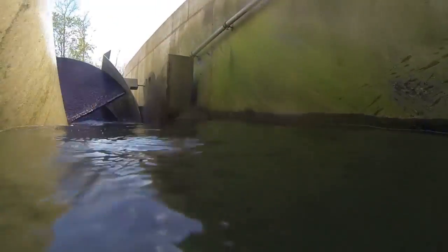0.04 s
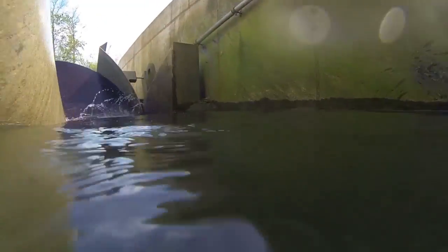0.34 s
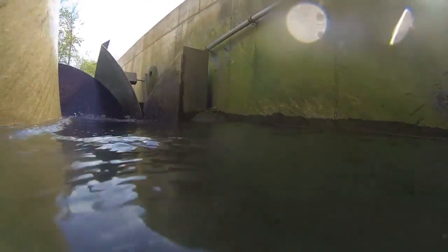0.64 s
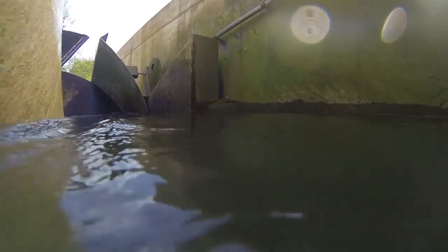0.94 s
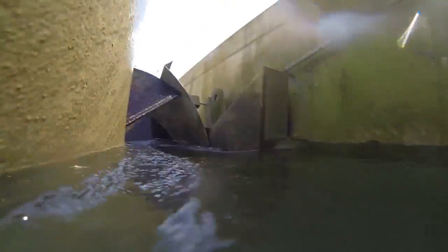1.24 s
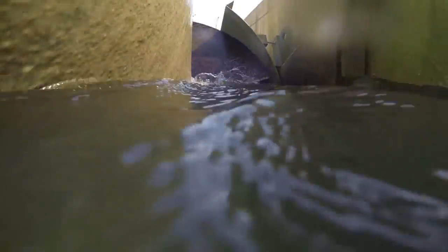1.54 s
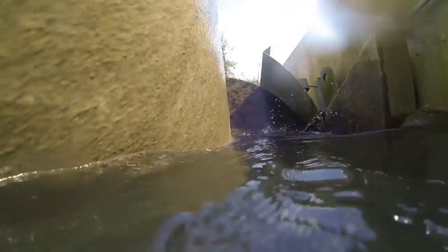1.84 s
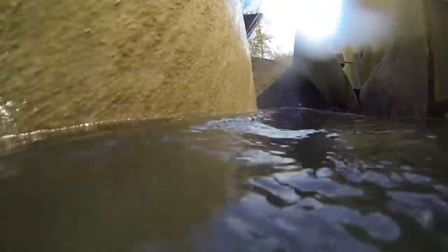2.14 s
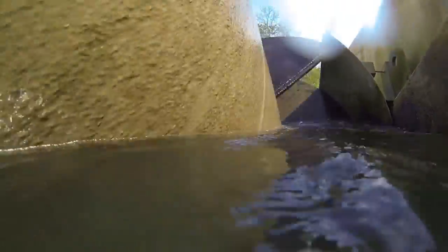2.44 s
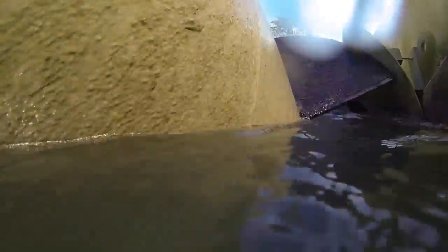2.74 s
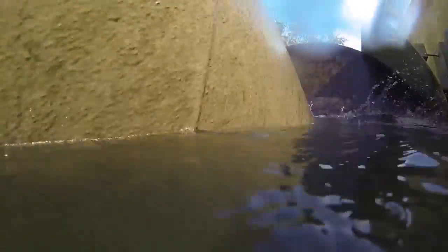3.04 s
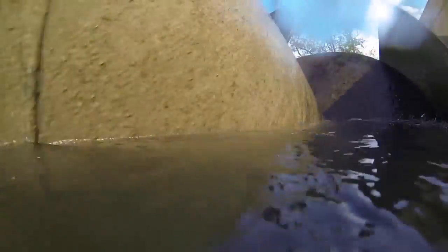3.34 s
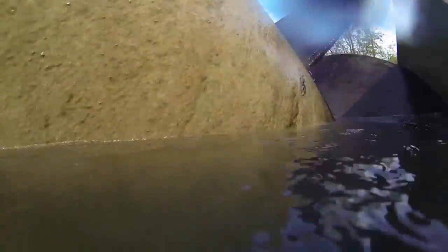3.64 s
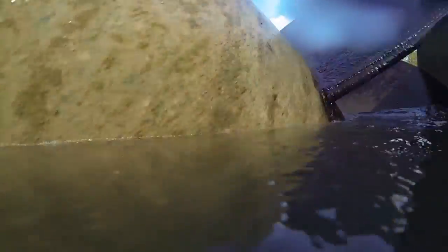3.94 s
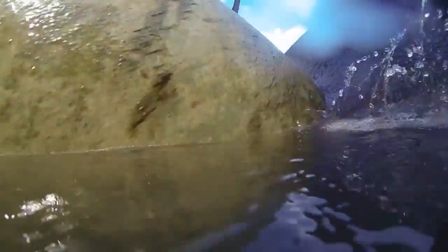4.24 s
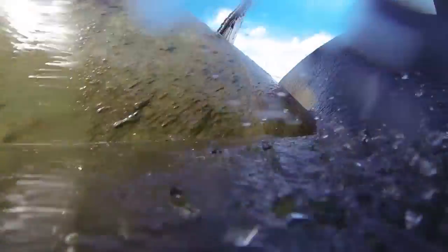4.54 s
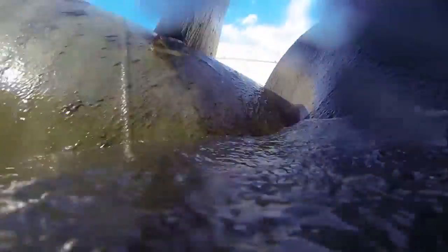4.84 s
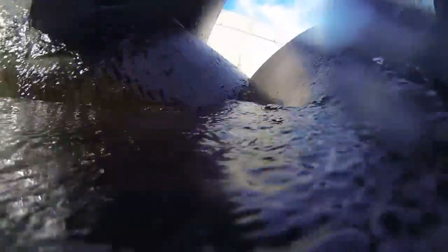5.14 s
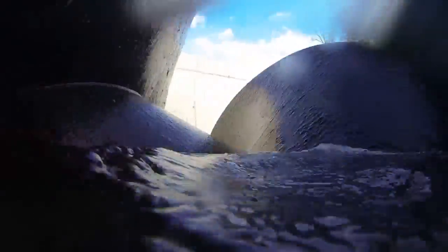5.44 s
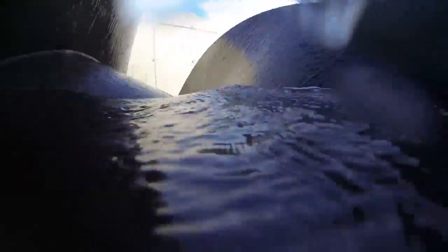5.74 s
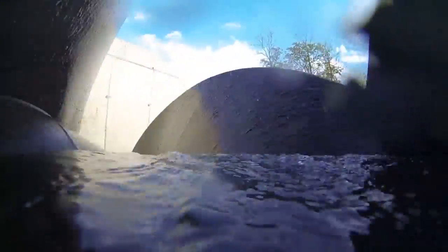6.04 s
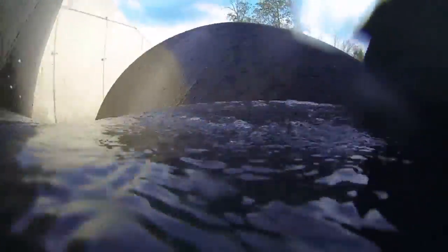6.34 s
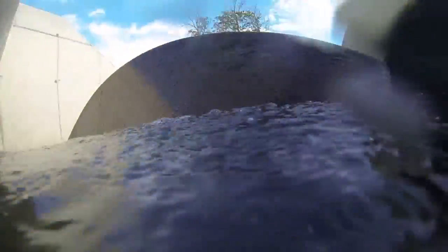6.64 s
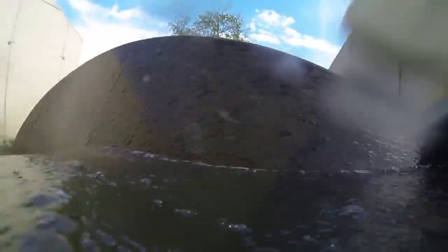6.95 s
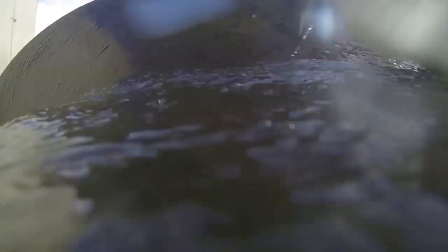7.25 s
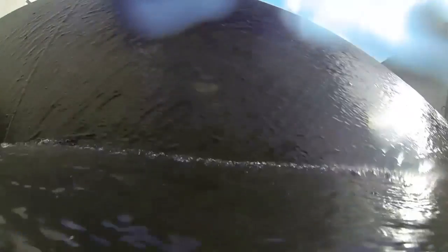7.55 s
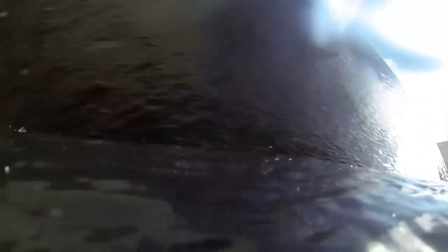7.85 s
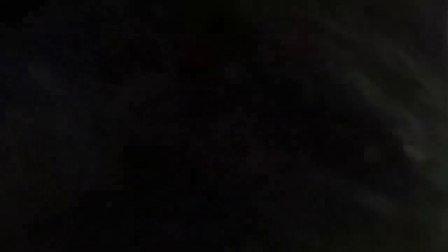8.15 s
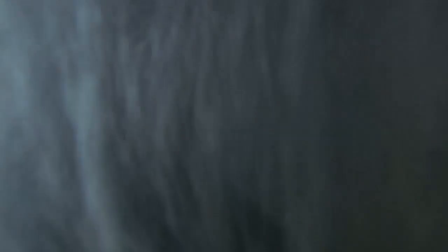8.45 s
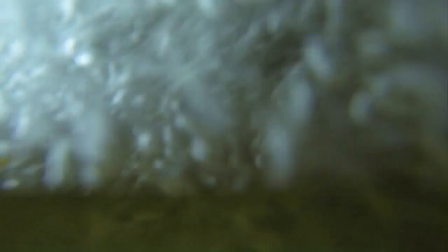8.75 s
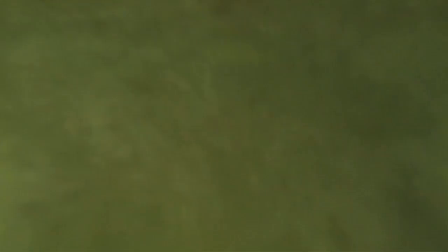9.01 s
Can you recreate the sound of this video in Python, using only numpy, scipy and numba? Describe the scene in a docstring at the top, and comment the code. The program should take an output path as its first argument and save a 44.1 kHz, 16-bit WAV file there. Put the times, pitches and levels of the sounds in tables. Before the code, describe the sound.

Water churns through a turning screw and grows louder, wavelets slap close by, then a knock and loud bubbling white water.

```python
"""A concrete water channel, heard from a microphone in a waterproof camera housing adrift on the surface.
At first a turning water screw churns some way ahead, its blades flinging showers and drops. From 1 s
wavelets slap the housing and trapped air gulps. The rush draws nearer, and the air between the blades
sounds a sinking note that booms around 6.4 s. At 8 s the housing knocks against a blade, is swamped,
and tumbles in white water with bubbles bursting right on its shell."""
import sys
import numpy as np
from scipy import signal
from scipy.fft import rfft, irfft
from scipy.io import wavfile
from scipy.ndimage import uniform_filter1d
from numba import njit

SR = 44100
rng = np.random.default_rng(int(sys.argv[2]) if len(sys.argv) > 2 else 0)


def log_audio(samples):
    """Write samples as a 16-bit WAV file to the path given in sys.argv[1]."""
    # one column per channel
    frames = np.atleast_2d(samples).T
    # limit to full scale, then quantise
    limited = np.clip(frames, -1, 1)
    pcm = np.round(limited * 32767).astype(np.int16)
    wavfile.write(sys.argv[1], SR, pcm)


N = 409248
T = np.arange(N) / SR


def undb(db):
    """Decibels to gain."""
    return 10 ** (np.asarray(db) / 20)


def unit(x):
    """Scale to rms 1."""
    return x / np.sqrt(np.mean(x ** 2))


def noise():
    """White noise."""
    return rng.standard_normal(N)


def band(x, lo_hz, hi_hz):
    """Steep band-pass."""
    return signal.sosfilt(signal.butter(4, [lo_hz, hi_hz], "band", fs=SR, output="sos"), x)


def colour(x, spectrum, bumps=()):
    """Causal filter from (f/Hz, level/dB) points, with (f/Hz, width/Hz, level/dB) bumps laid on top."""
    size = 8192
    f = np.maximum(np.fft.rfftfreq(size, 1 / SR), 1)
    hz, db = np.transpose(spectrum)
    db = np.interp(np.log(f), np.log(hz), db)
    db += sum(height * np.exp(-((f - centre) / width) ** 2) for centre, width, height in bumps)
    cepstrum = irfft(np.log(undb(db)))
    cepstrum[1:size // 2] *= 2  # folded for minimum phase
    cepstrum[size // 2 + 1:] = 0
    return signal.fftconvolve(x, irfft(np.exp(rfft(cepstrum))))[:N]


def wander(rate_hz):
    """Smooth random drift with rms 1."""
    hold = int(SR / rate_hz)
    steps = np.repeat(rng.standard_normal(N // hold + 1), hold)
    return unit(uniform_filter1d(steps, hold)[:N])


@njit
def ring(times, hz, t60, size, rise, onset):
    """Sum of damped sines that swell over `onset` cycles and climb by the share `rise` as they fade."""
    out = np.zeros(N)
    for k in range(len(times)):
        start, length = int(times[k] * SR), int(t60[k] * SR) + 2
        step = 2 * np.pi * hz[k] / SR
        phasor = size[k] + 0j
        turn = np.exp(1j * step - np.log(1000) / length)
        glide = np.exp(1j * step * rise / length)
        held, release = 1., np.exp(-hz[k] / SR / onset)
        for i in range(max(start, 0), min(start + length, N)):
            out[i] += phasor.imag * (1 - held) ** 2
            phasor *= turn
            turn *= glide
            held *= release
    return out


def bubbles(count, lo_hz, hi_hz, cycles, spread_db):
    """A cloud of bubbles: many faint, a few strong, each rising in pitch as it nears the surface."""
    when, pitch, life, strength = rng.random((count, 4)).T
    hz = lo_hz * (hi_hz / lo_hz) ** pitch
    # small bubbles die sooner, so they start stronger for the same energy per Hz
    size = undb(-spread_db * np.log(.01 + strength)) * hz
    return unit(ring(when * T[-1], hz, cycles * (.5 + life) / hz, size, rise=0.2, onset=cycles / 10))


# spectra of the rush, out in the open channel and in between the blades: f/Hz, level/dB
CHANNEL_SPECTRUM = [(15, -64), (25, -16), (49, 0.5), (118, -1.5), (191, -0.5), (250, -7), (394, -12),
                    (604, -14), (1150, -5.5), (1760, -17.5), (2180, -24), (2700, -24.5), (4500, -39.5),
                    (12100, -67), (15000, -56)]
SCREW_SPECTRUM = [(15, -55), (25, -10.5), (125, 3), (154, -1), (250, -10), (438, -10), (529, -10.5),
                  (691, -9.5), (1210, -6), (1580, -13), (2070, -23.5), (2700, -26.5), (4870, -40.5),
                  (5570, -50.5), (15000, -61.5)]
# resonances and dips of the housing around the microphone: f/Hz, width/Hz, level/dB
HOUSING_RESONANCES = [(177.6, 26, 5), (450, 18.5, 5), (530, 104, -6), (1108, 34, 3.5), (1329, 41, -8.5),
                      (1663, 284, 4.5), (2164, 410, -6.5), (2704, 210, 4), (3450, 97, 4), (3590, 220, 0.5),
                      (4070, 220, -4), (5220, 480, 6.5), (5420, 210, -8.5), (6170, 190, 7)]
# growth of the rush as the microphone drifts up to the screw: t/s, level/dB
APPROACH_LEVELS = [(0.05, -44.5), (1.73, -41.5), (1.93, -43), (4.19, -43.5), (4.39, -42), (5.01, -41),
                   (5.89, -36.5), (6.56, -37.5), (7.62, -34), (8.0, -28)]


def rush():
    """Water churned by the screw, distant at first; it fills out and brightens as the blades close in."""
    near_db = np.interp(T, *np.transpose(APPROACH_LEVELS)) + 42.5  # gain over the level far upstream
    inside = np.interp(T, [3.76, 5.1], [0, 1])
    water = noise() + undb(-8) * bubbles(16000, 251.4, 8740, cycles=13, spread_db=2.5)
    in_channel = unit(colour(water, CHANNEL_SPECTRUM, HOUSING_RESONANCES))
    in_screw = unit(colour(water, SCREW_SPECTRUM, HOUSING_RESONANCES))
    heard = (1 - inside) * in_channel + inside * in_screw
    churn = unit(band(heard, 22, 406)) * undb(-45.5 + 0.61 * near_db + 2 * wander(12))
    roar = unit(band(heard, 264, 2160)) * undb(-43 + near_db + 0.8 * wander(14))
    spray = unit(band(heard, 2330, 13300)) * undb(-60.5 + 1.21 * near_db + 1.1 * wander(45))
    afloat = np.interp(T, [8.1, 8.16], [1, 0])  # going under shuts out the airborne sound
    return (churn + roar + spray) * afloat


# a blade dipping in ahead, about every 1.3 s: t/s, half-length/s, shower level/dB, rumble level/dB
BLADE_DIPS = [(0.445, 0.08, -46, -48), (1.75, 0.042, -42.5, -56), (3.035, 0.11, -44, -51),
              (4.427, 0.12, -41, -41.5), (5.68, 0.048, -39.5, -42)]
# spectrum of the flung water landing: f/Hz, level/dB
PATTER_SPECTRUM = [(290, -47), (500, -6.5), (911, -2), (1550, -2.5), (2380, -18.5), (3620, -22),
                   (5660, -38), (14000, -52)]


def showers():
    """A blade plunges in with a low rumble, and the water it flings patters back as a fine wash."""
    fall, plunge = np.zeros((2, N))
    for s, half_s, shower_db, rumble_db in BLADE_DIPS:
        swell = np.exp(-((T - s) / half_s) ** 4 / 4)
        fall += undb(shower_db) * swell
        plunge += undb(rumble_db) * swell
    droplets = bubbles(9000, 610, 9900, cycles=10.7, spread_db=2.5) + undb(-2) * noise()
    patter = unit(colour(droplets, PATTER_SPECTRUM, [(2640, 1700, 6.1), (3500, 160, 4.7), (9150, 980, 7.6)]))
    rumble = unit(band(noise(), 27, 141))
    return fall * patter + plunge * rumble


def plops(table, spectrum, bumps, cycles, splat_s, rise, onset, brood_db):
    """Each drop or burst is a short splat, the ring of one bubble, then two weaker ones that break off."""
    s, splat_db, bubble_db, hz = np.array(table, float).T
    age = np.arange(SR // 10) / SR
    blows = np.zeros(N)
    blows[np.minimum((s * SR).astype(int), N - 1)] = undb(splat_db)
    fade = signal.fftconvolve(blows, np.exp(-age / splat_s))[:N]
    white = noise()
    # the housing colours the splat and rounds its edge
    steady, splat = (band(colour(x, spectrum, bumps), 560, 18000) for x in (white, white * fade))
    t60 = cycles / hz * np.sqrt(hz / 2000)  # small, high bubbles ring for more cycles
    out = splat / np.std(steady) + ring(s, hz, t60, undb(bubble_db + 5.5), rise, onset)
    for wait, detune in rng.random((len(s), 2, 2)).transpose(1, 2, 0):
        brood_hz = hz * 2 ** (0.59 * (detune - .5))
        out += ring(s + 0.017 * wait, brood_hz, t60, undb(bubble_db + brood_db), rise, onset)
    return out


# single drops off the blades: t/s, splat level/dB, relative bubble level/dB, bubble f/Hz
BLADE_DROPS = [(.4305, -35.5, -45, 2750), (.847, -30.5, -60, 4000), (1.872, -53, -32, 1110),
               (2.565, -50, -45, 2730), (2.858, -44, -31.5, 1475), (3.639, -36, -43.5, 1110),
               (4.316, -38, -27.5, 1000), (4.4215, -28, -48, 2880), (4.451, -34, -28, 1004),
               (4.471, -31, -29.5, 780), (4.509, -29, -48, 4200), (4.543, -35, -53, 9130),
               (4.548, -24.5, -41, 1140), (5.082, -28.5, -52, 4550), (5.434, -48, -46, 4710),
               (5.697, -21, -39, 2650), (6.089, -35, -25.5, 764), (7.017, -29, -28.5, 775)]


def drops():
    """Drops fall from the blades into the channel and leave clearly ringing bubbles."""
    return plops(BLADE_DROPS, CHANNEL_SPECTRUM, [(4500, 6300, 3.2)],
                 cycles=53, splat_s=0.0031, rise=0.066, onset=0.59, brood_db=-2.5)


# waves on the housing, right at the microphone:
# t/s, push level/dB, push half-width/s, wash level/dB, wash half-length/s, spray level/dB
WAVE_HITS = [(1.092, -5.5, 0.0027, -19.5, 0.0051, -37.5), (1.0965, -6.5, 0.0025, -23.5, 0.003, -36),
             (1.266, -4, 0.00647, -19.5, 0.009, -28.5), (1.455, -16, 0.0074, -21.5, 0.0094, -32),
             (1.544, -28, 0.0067, -25.5, 0.021, -40.5), (1.605, -36, .003, -28, 0.0022, -34.5),
             (1.627, -32, 0.0038, -24, 0.019, -39.5), (8.024, -15, 0.0071, -39, 0.018, -60),
             (8.092, -4, 0.0019, -18, 0.0096, -40), (8.124, -5, 0.0054, -24, 0.012, -24.5),
             (8.131, -4, 0.0033, -14, 0.002, -28), (8.56, -30, 0.0044, -30, 0.015, -28),
             (8.776, -7, 0.0055, -40, 0.0093, -47), (8.949, -9.5, 0.0084, -22, 0.014, -45)]
# spectra of their wash and their spray: f/Hz, level/dB
WASH_SPECTRUM = [(71, -42), (120, 0), (214, -2), (295, -12), (458, -17.5), (648, -13.5), (860, -13.5),
                 (965, -19), (1480, -10.5), (1880, -30), (2600, -56), (3380, -53), (5720, -120)]
SPRAY_SPECTRUM = [(1180, -16.5), (2000, 5.5), (2580, -3.5), (4810, -8), (5360, -19), (7770, -32.5),
                  (8970, -35), (9840, -36.5), (15000, -60)]


def slaps():
    """A wave shoves the housing (one slow swing of pressure), washes over it and breaks into spray."""
    push, wash, spray = np.zeros((3, N))
    skew = 0.25  # water arrives quickly and drains slowly
    for s, push_db, push_s, wash_db, wash_s, spray_db in WAVE_HITS:
        stretch = np.maximum(1 + skew * (T - s) / push_s, 1e-3)
        push_time = np.log(stretch) / skew
        push += undb(push_db) * (1 - push_time ** 2) * np.exp(-push_time ** 2 / 2) / stretch
        ahead = (T - s) / wash_s + 0.42  # the wash leads the push a little
        wash_time = np.log(np.maximum(1 + skew * ahead, 1e-3)) / skew
        wetting = np.exp(-wash_time ** 2 / 2)
        wash += undb(wash_db) * wetting
        spray += undb(spray_db) * wetting
    froth = noise() + undb(3) * bubbles(24000, 394, 13300, cycles=15.4, spread_db=4.5)
    wash *= unit(colour(froth, WASH_SPECTRUM))
    # wavelets break dully; from the knock on, white water off the blade is far brighter
    dull = unit(colour(froth, SPRAY_SPECTRUM, [(3730, 910, 3), (10000, 3800, -0.5)]))
    bright = unit(colour(froth, SPRAY_SPECTRUM, [(13000, 7300, 16.6)]))
    spray *= np.where(T < BLADE_BLOWS[0][0], dull, bright)
    return push + shell_flex() + wash + spray


def shell_flex(hz=344., t60_s=.035):
    """Each wave's push flexes the shell, which rings briefly in its lowest mode."""
    s, push_db = np.array(WAVE_HITS, float).T[:2]
    size = undb(np.minimum(push_db, -6) - 7.5)
    return ring(s, np.full(len(s), hz), np.full(len(s), t60_s), size, rise=0., onset=0.57)


# pockets of trapped air: t/s, relative level/dB, f/Hz
AIR_POCKETS = [(1.604, -15.5, 680), (1.621, -18, 598), (5.409, -34.5, 96.4), (5.681, -29.5, 97),
               (5.74, -30, 72)]


def gulps():
    """Air trapped against the housing and under the blades rings with a hollow, low note."""
    s, db, hz = np.array(AIR_POCKETS, float).T
    return ring(s, hz, 24 / hz, undb(db + 5), rise=0.028, onset=0.55)


def cavity(start_s=2.1, start_hz=434.4, sink_oct_per_s=.32):
    """The rush excites the air between the blades; its note sinks as the space closes around the camera."""
    hz = start_hz * 2 ** (-sink_oct_per_s * (T - start_s))
    phase = 2 * np.pi * np.cumsum(hz) / SR
    hollow = unit(wander(105) * np.cos(phase) + wander(105) * np.sin(phase))
    boom_db = 13 * np.exp(-((T - 6.41) / 0.84) ** 2)  # the microphone passes the mouth of the screw
    present = np.interp(T, [start_s - .2, start_s, 8.0, 8.1], [0, 1, 1, 0])
    return hollow * undb(-52 + boom_db) * present


# white water all around the microphone: t/s, relative flow level/dB, relative buffeting level/dB
WHITE_WATER = [(8.16, -40.5, -13.5), (8.186, -40.5, -33), (8.272, -30, -22.5), (8.558, -25, -17.5),
               (8.728, -29.5, -22), (8.772, -24.5, -13), (8.834, -27.5, -22.5), (8.918, -19, -10.5),
               (9.056, -27, -29), (9.168, -32.5, -17.5), (9.26, -31.5, -23)]
# spectrum of foam against the shell: f/Hz, level/dB
FOAM_SPECTRUM = [(12, 4), (20, 4), (103, -2.5), (202, -12.5), (362, -16.5), (416, -21), (746, -17.5),
                 (1500, -17), (2090, -25.5), (3260, -31.5), (3750, -37.5), (5090, -45), (6910, -55.5),
                 (9930, -55.5), (15500, -86)]


def torrent():
    """Eddies buffet the housing while bubbles gurgle, fizz and crackle right against it."""
    s, *levels = np.transpose(WHITE_WATER)
    flow_db, buffet_db = (np.interp(T, s, db) for db in levels)
    fizz_db = -45 + 1.25 * (flow_db + 25.5)  # fizz grows faster than the flow
    swamped = undb(np.interp(T, [7.9, 8.01, 8.1, 8.16], [-32, -8.5, 0, 1.5])) * (T > 7.9)
    surge = wander(40)
    large = bubbles(9000, 299, 3550, cycles=13, spread_db=3.5)
    small = bubbles(3500, 2670, 13500, cycles=33, spread_db=6)
    crackle = bubbles(1200, 2500, 12500, cycles=6, spread_db=3.5)
    # single eddies thump the shell for about one cycle each
    eddies = noise() + undb(6) * bubbles(800, 28.6, 223, cycles=4.3, spread_db=1)
    buffet = unit(band(colour(eddies, FOAM_SPECTRUM), 20, 354)) * undb(buffet_db - 1 + 0.35 * surge)
    coarse = colour(undb(6) * noise() + large, FOAM_SPECTRUM)
    gurgle = unit(band(coarse, 232, 2800)) * undb(flow_db - 1 + 0.4 * surge)
    # the shell lets the finest fizz through its high resonances
    fine = colour(noise() + small + undb(-2.5) * crackle, FOAM_SPECTRUM, [(9800, 470, 1), (13400, 1700, 16)])
    fizz = unit(band(fine, 2920, 15000)) * undb(fizz_db + 1.4 * surge)
    return swamped * (buffet + gurgle + fizz)


# the blow against the blade and its rebound: t/s, level/dB
BLADE_BLOWS = [(8.0646, -3), (8.07, -27)]
# modes of the struck shell around the microphone: f/Hz, level/dB, t60/s
SHELL_MODES = [(374.5, -15, 0.18), (630, -8.5, 0.038), (693, -6.5, 0.097), (880, 3.5, 0.017),
               (1220, -26, .028), (1346, -4, 0.041), (1590, -5.5, 0.041), (2930, -24, 0.032),
               (4360, -31, 0.013)]


def knock():
    """The housing strikes a steel blade; the water cushions the blow and damps the modes quickly."""
    hz, db, t60 = np.array(SHELL_MODES, float).T
    return sum(ring(np.full(len(hz), s), hz, t60, undb(db + blow_db), rise=0., onset=0.22)
               for s, blow_db in BLADE_BLOWS)


# bursts right at the microphone: t/s, splat level/dB, relative bubble level/dB, bubble f/Hz
SHELL_BURSTS = [(8.368, -29, -36, 9300), (8.453, -31, -45, 7900), (8.521, -18, -17, 1160),
                (8.573, -18, -13, 1740), (8.613, -24, -17.5, 2760), (8.667, -33, -25.5, 3150),
                (8.685, -22, -36.5, 5060), (8.749, -19, -32, 8200), (8.803, -19, -23.5, 2900),
                (8.854, -36, -22, 9830), (8.912, -9.5, -31.5, 5900), (9.103, -29, -20.5, 2940),
                (9.112, -17, -28, 3940), (9.274, -16.5, -6, 3160)]


def pops():
    """Bubbles burst on the swamped shell with a bright splat and a short ring."""
    return plops(SHELL_BURSTS, FOAM_SPECTRUM, [(10600, 11400, 14)],
                 cycles=23, splat_s=0.002, rise=0.028, onset=0.29, brood_db=-3)


def scene():
    """The water out in the channel and close on the housing, over faint microphone hiss, in mono."""
    channel = rush() + showers() + drops() + gulps() + cavity()
    housing = slaps() + torrent() + knock() + pops()
    hiss = undb(-73.5) * noise()
    return (channel + housing + hiss)[None]


def record(dry):
    """The camera clips the loudest blows at full scale and cuts the treble above 15.3 kHz."""
    low_pass = signal.ellip(8, .2, 70, 15300, fs=SR, output="sos")
    return signal.sosfilt(low_pass, np.clip(dry, -1, 1))


dry = scene()
out = record(dry)
log_audio(out)
```